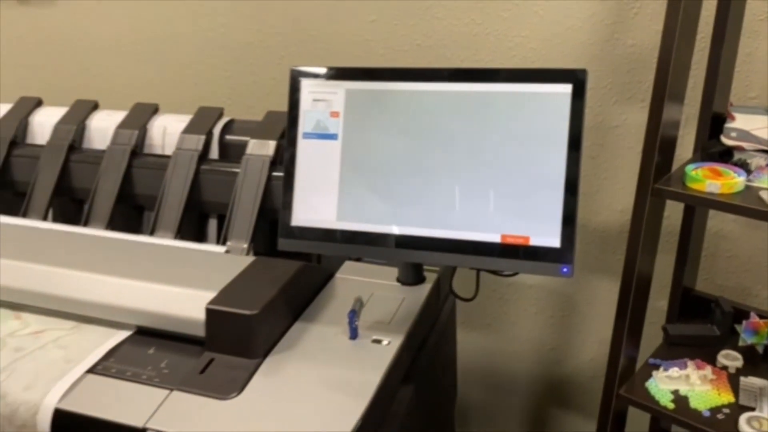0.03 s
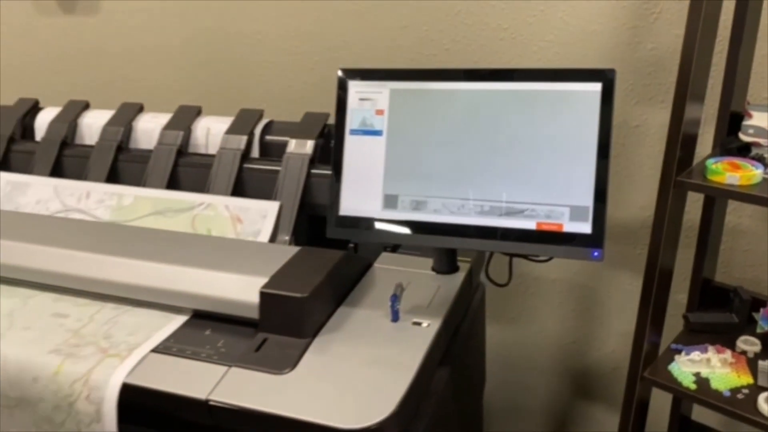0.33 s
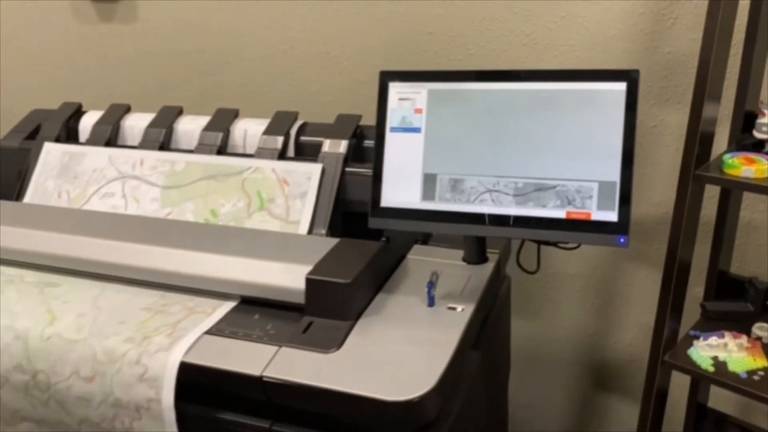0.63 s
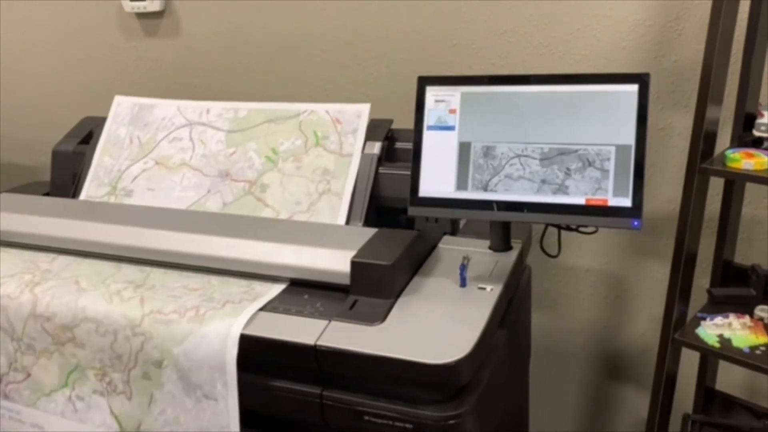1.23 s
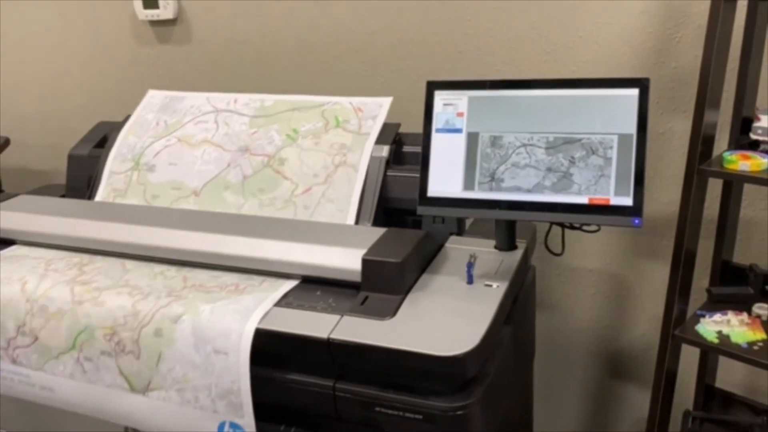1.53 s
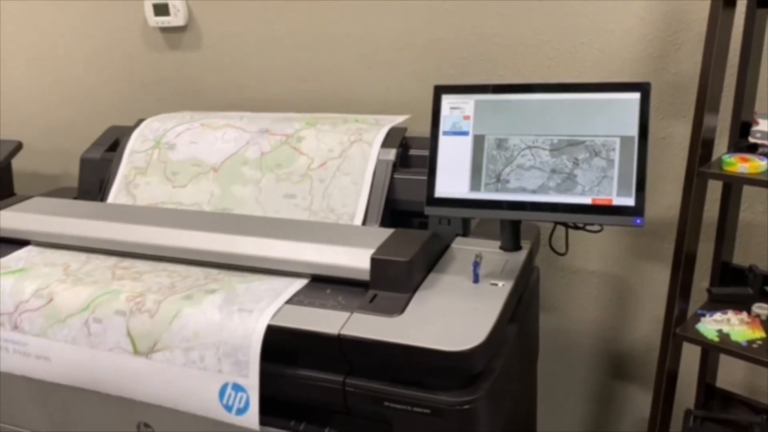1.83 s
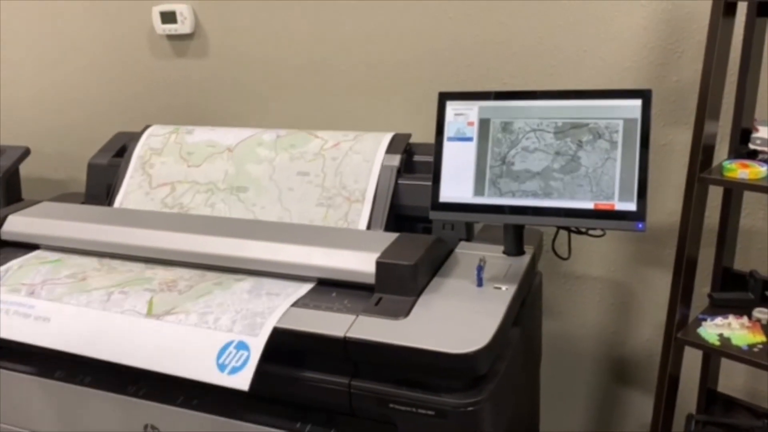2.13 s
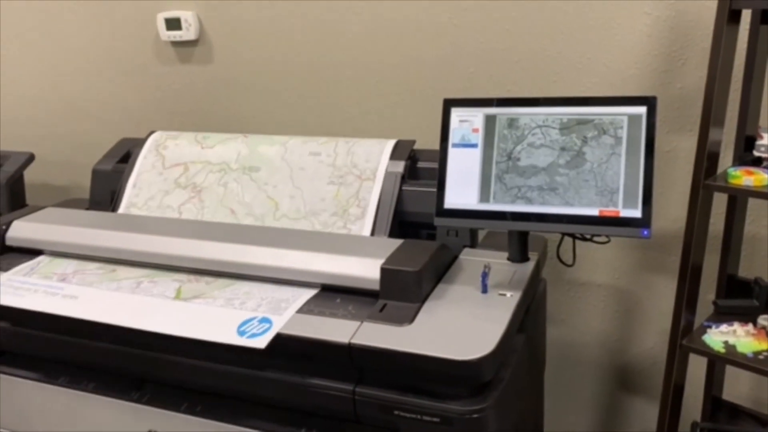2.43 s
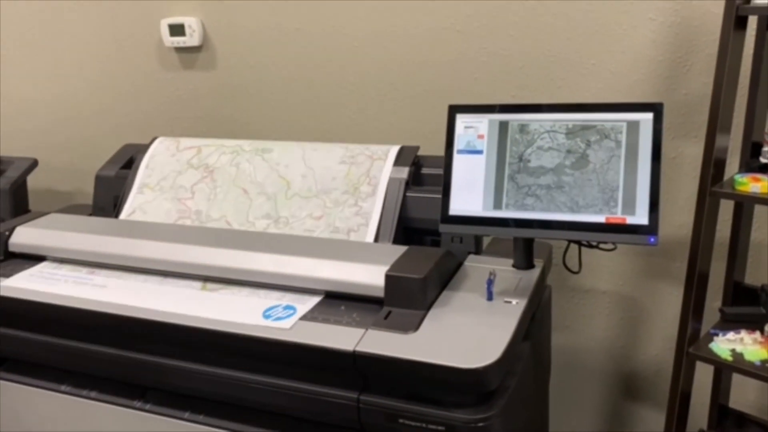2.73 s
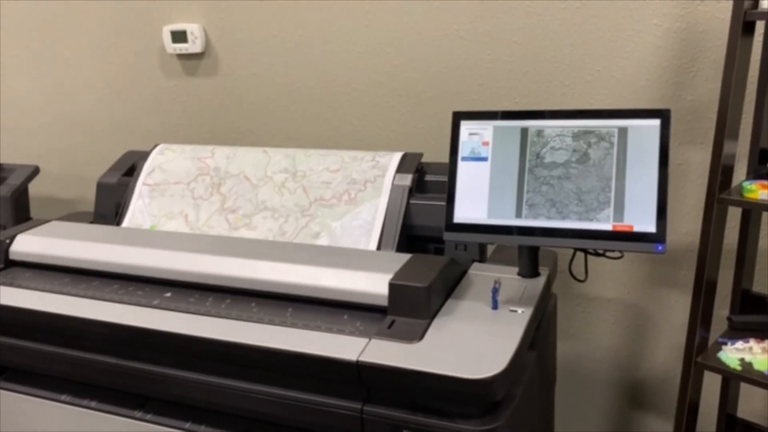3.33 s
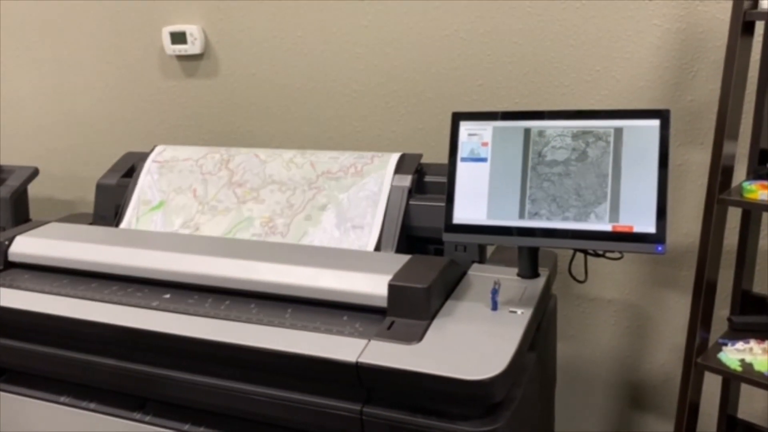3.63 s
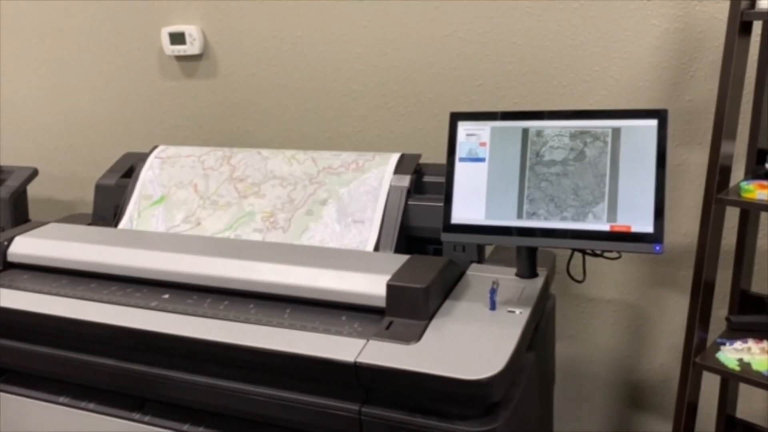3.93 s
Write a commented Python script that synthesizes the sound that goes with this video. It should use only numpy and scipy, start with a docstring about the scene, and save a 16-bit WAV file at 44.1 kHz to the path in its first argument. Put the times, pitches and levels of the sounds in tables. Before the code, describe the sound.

Close by in a small office, a large scanner's motor whirs as rollers pull a big sheet through with a hiss and faint crinkles. The paper's edge slaps out, the feed halts with a soft thud, and fans keep running.

```python
"""A large-format scanner draws a paper map through its rollers in a small office.
From the start, over mains hum and cooling fans, the feed motor sings and the rollers rumble.
The sliding sheet hisses, crinkles and ticks as it buckles, slowly growing quieter.
Near the end its edge scrapes and slaps out of the rollers and the housing rings.
At 3.8 s the feed stops with a soft thud; hum and fans go on."""
import sys
import numpy as np
from scipy import signal
from scipy.fft import rfft, irfft
from scipy.io import wavfile

SR = 44100
rng = np.random.default_rng(int(sys.argv[2]) if len(sys.argv) > 2 else 0)


def bounce(signal):
    """Save signal as a 16-bit WAV file at the path given by the first command-line argument."""
    frames = np.transpose(np.atleast_2d(signal))
    limited = np.clip(frames, -1, 1)
    pcm = np.round(limited * 32767).astype(np.int16)
    wavfile.write(sys.argv[1], SR, pcm)


N = 176400
TIME_S = np.arange(N) / SR
BINS_HZ = np.arange(N // 2 + 1) * SR / N


def from_db(db):
    """Decibels to gain."""
    return 10 ** (np.asarray(db) / 20)


def rms_one(x):
    """Scale to rms 1."""
    return x / np.sqrt(np.mean(x ** 2) + 1e-20)


def over_bins(points):
    """Interpolate a table over log frequency."""
    hz, value = np.transpose(points)
    return np.interp(np.log(BINS_HZ + 1), np.log(hz), value)


def over_time(points):
    """Interpolate a table over time."""
    return np.interp(TIME_S, *np.transpose(points))


def drift(rate_hz):
    """Slow random motion, mean 0, rms 1."""
    lowpass = (BINS_HZ > 0) / (1 + (BINS_HZ / rate_hz) ** 2)
    return rms_one(irfft(rfft(rng.standard_normal(N)) * lowpass, N))


def band(x, centre_hz, width_oct):
    """Band-pass that keeps the power of white noise."""
    edge_ratio = 2 ** (np.clip(width_oct, .2, 4) / 2)
    low_hz, high_hz = centre_hz / edge_ratio, min(centre_hz * edge_ratio, .45 * SR)
    sos = signal.butter(2, [low_hz, high_hz], "band", fs=SR, output="sos")
    return signal.sosfilt(sos, x + 1e-18) * np.sqrt(SR / 2 / (high_hz - low_hz))


# Left-right likeness at the microphones: freq_hz, coherence
COHERENCE = [(60, 0.89), (320, 1), (550, -0.013), (800, 0.15), (1500, 0.48), (2000, -0.13), (2800, 0.47),
             (4300, 0.12), (5600, 0.048), (6400, 0.28), (7100, 0.75), (8400, 1)]

def stereo_noise(bin_gain):
    """Diffuse shaped noise, rms 1, partly alike in both channels."""
    mid, side = rfft(rng.standard_normal((2, N)))
    coherence = np.clip(over_bins(COHERENCE), -1, 1)
    spectrum = np.sqrt(1 + coherence) * mid + np.sqrt(1 - coherence) * side * [[1], [-1]]
    return rms_one(irfft(bin_gain * spectrum, N))


def resonant_noise(centre_hz, half_width_hz):
    """Stereo noise in one resonance peak."""
    return stereo_noise(1 / (1 + ((BINS_HZ - centre_hz) / half_width_hz) ** 2))


def rush(spectrum, flicker_db, flicker_hz):
    """Coloured stereo noise with a flickering level."""
    return stereo_noise(from_db(over_bins(spectrum))) * from_db(flicker_db * drift(flicker_hz))


def office(direct, t60_s=0.5, wet_db=-4.5):
    """Direct sound plus the room's short diffuse tail."""
    tail = stereo_noise(1) * from_db(-60 * TIME_S / t60_s)
    tail /= np.sqrt(np.sum(tail ** 2) / 2)
    return direct + from_db(wet_db) * signal.fftconvolve(direct[None], tail, axes=1)[:, :N]


def mains_hum(pitch_hz=119.9, level_db=-35.5, waver_db=.5):
    """The power supply hums on one tone."""
    amplitude = np.sqrt(2) * from_db(level_db + waver_db * drift(1.8))
    return amplitude * np.sin(2 * np.pi * pitch_hz * TIME_S)


# Fan whines: pitch_hz, level_db
FAN_WHINES = [(1064, -60.5), (1226, -68), (1249, -69), (1635, -70)]
# Air noise: freq_hz, relative_db
FAN_SPECTRUM = [(22, -35), (33, -17), (42, -8), (54, 7.5), (66, -1), (95, 1), (140, 4.5), (175, -5.5),
                (260, -6.5), (450, -16), (700, -15.5), (1150, -21), (1500, -31), (2600, -27.5),
                (4000, -35.5), (7000, -56), (15000, -67)]

def fans(air_db=-43):
    """Cooling fans move air and give narrow, unsteady whines."""
    whines = sum(from_db(db) * resonant_noise(hz, half_width_hz=2.3) for hz, db in FAN_WHINES)
    return whines + from_db(air_db) * rush(FAN_SPECTRUM, flicker_db=1.5, flicker_hz=17)


# Roller and gear noise: freq_hz, relative_db
ROLLER_SPECTRUM = [(120, -20), (210, -13.5), (260, -0.5), (335, 0), (410, -5.5), (490, -2.5), (560, -11.5),
                   (800, -8), (1150, -9.5), (1450, -13), (1800, -13), (2200, -16), (3000, -16),
                   (5000, -25.5), (8000, -27), (15000, -54)]
# Rise and fall of the rumble: time_s, relative_db
ROLLER_ENVELOPE = [(0.0, -5), (0.4, -0.5), (2.1, 0.4), (2.9, -1.5), (3.5, 1)]

def rollers(level_db=-48):
    """Turning rollers and gears rumble unevenly."""
    rumble = rush(ROLLER_SPECTRUM, flicker_db=2.0, flicker_hz=13)
    return from_db(level_db + over_time(ROLLER_ENVELOPE)) * rumble


# Motor partials: harmonic, start_db, slope_db_per_s, waver_db
MOTOR_PARTIALS = [(1, -40.5, -0.23, -0.26), (2, -53.5, -0.87, 3.2), (3, -71, 0, -5), (4, -66.5, 0.5, 4.5),
                  (8, -68.5, -1, 3)]

def feed_motor(step_hz=297.1, flutter_ratio=0.0028):
    """The motor sings at its slightly unsteady stepping rate."""
    phase = 2 * np.pi * np.cumsum(step_hz * (1 + flutter_ratio * drift(7.5))) / SR
    tone = 0
    for harmonic, start_db, slope_db_per_s, waver_db in MOTOR_PARTIALS:
        amplitude = np.sqrt(2) * from_db(start_db + slope_db_per_s * TIME_S + waver_db * drift(17))
        tone += amplitude * np.sin(harmonic * phase + rng.uniform(0, 2 * np.pi))
    return tone


# Housing modes: pitch_hz, relative_db, t60_s
HOUSING_MODES = [(214, -4, .13), (259.8, 0, 0.14), (339, 0, 0.087), (442, -7.5, 0.096)]
# Knocks of the feed on the housing: start_s, level_db
KNOCKS = [(3.665, -29), (3.692, -38), (3.778, -29), (3.806, -32.5)]

def housing_thumps(attack_s=0.0026):
    """The housing rings as the sheet is let go; the feed halts with a low thud."""
    def ring(start_s, level_db, pitch_hz, t60_s):
        age_s = np.maximum(TIME_S - start_s, 0)
        decay = from_db(level_db - 60 * np.minimum(age_s / t60_s, 2))
        return decay * (1 - np.exp(-age_s / attack_s)) * np.sin(2 * np.pi * pitch_hz * age_s)

    knocks = sum(ring(start_s, level_db + mode_db + rng.normal(0, 1), pitch_hz, t60_s)
                 for start_s, level_db in KNOCKS for pitch_hz, mode_db, t60_s in HOUSING_MODES)
    return knocks + ring(start_s=3.802, level_db=-20.5, pitch_hz=97.5, t60_s=0.058)


# Paper hiss: freq_hz, relative_db
HISS_SPECTRUM = [(700, -15), (1200, 0), (1700, -2.5), (2200, -4.5), (2900, -4), (3500, 2), (3800, -7.5),
                 (4900, 2), (5600, -0.5), (6400, -2.5), (7600, -2), (9000, -1), (11000, -4.5),
                 (13000, -3.5), (15500, -9.5)]
# Reflections off bed and wall: delay_ms, gain_db
HISS_REFLECTIONS = [(1.9, -29), (4.6, -25)]
# Sheet resonances: centre_hz, half_width_hz, relative_db
SHEET_RESONANCES = [(2200, 98, -10.5), (4136, 300, -9.5), (6320, 170, -15)]
# Fade of the slide: time_s, relative_db
SLIDE_ENVELOPE = [(0.0, -52), (0.96, -53), (1.26, -52.5), (1.88, -55.5), (2.18, -57.5), (3.62, -61)]

def paper_slide(gain_db=2, waver_db=2.0, grain_db=1.1, grain_hz=70):
    """The sheet drags over the bed: a grainy hiss with resonances that come and go."""
    hiss = rush(HISS_SPECTRUM, flicker_db=1.42, flicker_hz=11) * from_db(grain_db * drift(grain_hz))
    echoes = sum(from_db(db) * np.roll(hiss, int(ms * SR / 1000), axis=1) for ms, db in HISS_REFLECTIONS)
    rings = sum(from_db(db + waver_db * drift(8.2)) * resonant_noise(centre_hz, half_width_hz)
                for centre_hz, half_width_hz, db in SHEET_RESONANCES)
    return from_db(gain_db + over_time(SLIDE_ENVELOPE)) * (rms_one(hiss + echoes) + rings)


# Crinkle registers: centre_hz, start_db
CRINKLE_BANDS = [(1100, -61), (2250, -62), (4200, -61)]

def paper_crinkles(rate_per_s=45, spread_db=3.5, decay_s=.004, width_oct=0.72, slope_db_per_s=-2.3):
    """The flexing sheet gives faint random crackles, each dying quickly in one register."""
    out, pole = 0, np.exp(-1 / (decay_s * SR))
    for centre_hz, start_db in CRINKLE_BANDS:
        sizes = from_db(spread_db * np.minimum(rng.exponential(1, N), 3))
        onsets = rng.random(N) < rate_per_s / SR
        power = signal.lfilter([1], [1, -pole ** 2], sizes ** 2 * onsets + 1e-18)
        bursts = np.sqrt(power) * rng.standard_normal(N)
        out += from_db(start_db) * rms_one(band(bursts, centre_hz, width_oct))
    return out * from_db(slope_db_per_s * TIME_S)


# Buckling ticks: start_s, level_db, centre_hz, decay_s, width_oct
BUCKLE_TICKS = [(0.153, -40, 3950, 0.0034, .25), (0.153, -43.5, 6400, .004, 0.48),
                (0.268, -39.5, 2400, 0.0033, 1.2), (0.408, -40.5, 3700, .006, .7),
                (0.409, -38, 2150, .009, 0.28), (0.415, -36, 1400, 0.0065, 1.2),
                (0.733, -40.5, 1110, 0.008, 0.61), (0.961, -45, 4400, .006, .3),
                (1.121, -34.5, 4540, 0.0026, .35), (1.120, -39.5, 1900, .007, 1.4),
                (1.121, -39.5, 1080, 0.012, .45), (1.274, -45, 4530, .0053, .2),
                (1.363, -41.5, 3150, 0.0049, .6), (1.364, -40, 1250, .011, 1.3),
                (1.363, -47, 9500, .004, 1), (1.645, -49.5, 6000, .008, .3), (1.952, -45, 1600, 0.017, 1.9),
                (2.145, -43, 900, .004, 1), (2.494, -45, 1900, 0.0058, 1), (2.742, -46, 1900, 0.0057, 0.59),
                (2.791, -49, 3000, .0046, 2), (3.041, -40, 950, 0.0045, 1.5),
                (3.265, -46, 2900, 0.0037, 1.2)]
# A swish over the bed, then edge scrapes and slaps: start_s, level_db, centre_hz, decay_s, width_oct
EDGE_SLAPS = [(2.405, -51, 8460, .05, 1.6), (3.082, -42, 2300, .009, .9), (3.087, -35.5, 1000, .008, 1.3),
              (3.109, -39, 1000, .009, 1.7), (3.341, -37, 1020, .013, 1.2), (3.344, -41.5, 2400, .008, .7),
              (3.647, -40.5, 2600, 0.011, 3.1), (3.658, -41, 6000, 0.008, 1.5),
              (3.665, -35.5, 2400, 0.0072, 1.1), (3.668, -34, 1170, 0.0068, 0.51),
              (3.693, -50, 3000, 0.0082, 1.5), (3.755, -49.5, 5450, 0.012, 1.3),
              (3.768, -38, 900, 0.017, 2), (3.771, -33.5, 2050, .0065, 0.78), (3.769, -48, 4200, .02, 0.76),
              (3.794, -41, 750, .015, 2), (3.825, -38.5, 850, 0.015, 1.3), (3.824, -43, 2370, 0.0076, 0.54)]

def paper_bursts(events, attack_s):
    """Each tick or slap is a dying noise burst in a resonance of the sheet."""
    out, count = np.zeros(N + SR), SR // 5
    age_s = TIME_S[:count]
    for start_s, level_db, centre_hz, decay_s, width_oct in events:
        burst = rng.standard_normal(count) * (1 - np.exp(-age_s / attack_s)) * np.exp(-age_s / decay_s)
        start = int(start_s * SR)
        out[start:start + count] += from_db(level_db) * band(burst, centre_hz, width_oct)
    return out[:N]


def feed_gate(t60_s, stop_s=3.78):
    """Unity gain while the feed runs, then a dying tail."""
    return from_db(-60 * np.maximum(TIME_S - stop_s, 0) / t60_s)


def scene():
    """The feed runs and stops, its rumble dying last; hum and fans go on."""
    slow_stop, fast_stop = feed_gate(t60_s=0.52), feed_gate(t60_s=0.071)
    feed = slow_stop * rollers() + fast_stop * (feed_motor() + paper_slide())
    ticks = paper_bursts(BUCKLE_TICKS, attack_s=.0004)
    slaps = paper_bursts(EDGE_SLAPS, attack_s=0.0043)
    sheet = ticks + slaps + fast_stop * paper_crinkles()
    return mains_hum() + fans() + feed + housing_thumps() + office(sheet)


# Stereo balance: freq_hz, left_minus_right_db
STEREO_BALANCE = [(60, 1.2), (200, 1.5), (380, 1), (620, 4.6), (1290, 3), (2400, 2), (4400, 1), (8000, 0)]
# Left-right phase of the stereo image: freq_hz, left_lead_rad
STEREO_PHASE = [(0, 0), (80, -.33), (300, -.22), (600, -.35), (1000, -.5), (1500, -1.8), (2400, -.5),
                (3000, -1), (4000, 0), (7400, 0), (8000, 1.3), (8400, 3.14), (9600, 3.14), (10400, 0),
                (11600, 0), (12200, 1.3), (12550, 3.14), (13700, 3.14), (14500, 0)]

def record(dry):
    """The image leans left; stereo widening puts two treble bands in antiphase; the top is cut."""
    sides, cutoff_hz = np.array([[1], [-1]]), 15800
    gain = from_db(sides * over_bins(STEREO_BALANCE) / 2)
    phase_rad = sides * np.interp(BINS_HZ, *np.transpose(STEREO_PHASE)) / 2
    impulse = irfft(gain * np.exp(1j * phase_rad), N)
    taps = np.roll(impulse, 256, axis=1)[:, :513] * signal.windows.hann(513)
    heard = signal.fftconvolve(dry, taps, mode="same", axes=1)
    return signal.sosfilt(signal.ellip(10, .1, 80, cutoff_hz, fs=SR, output="sos"), heard)


dry = scene()
out = record(dry)
bounce(out)
```